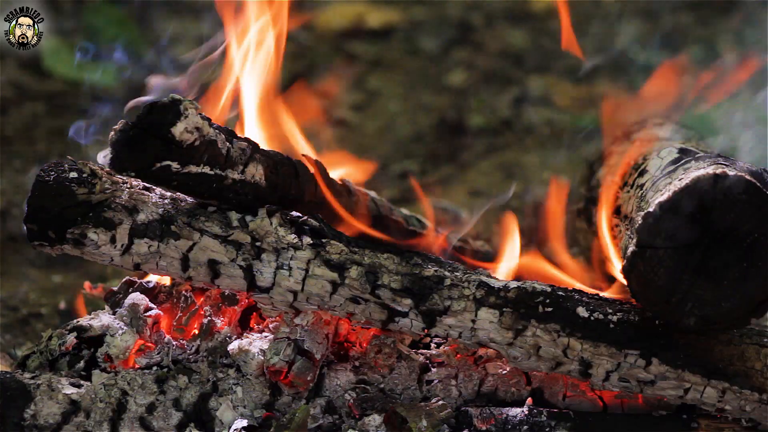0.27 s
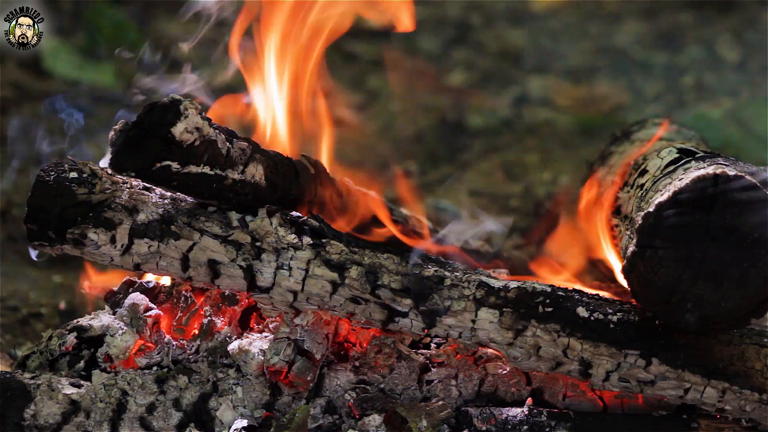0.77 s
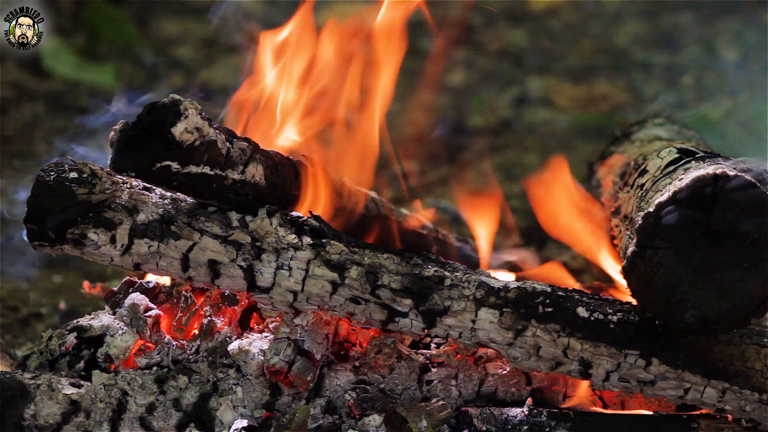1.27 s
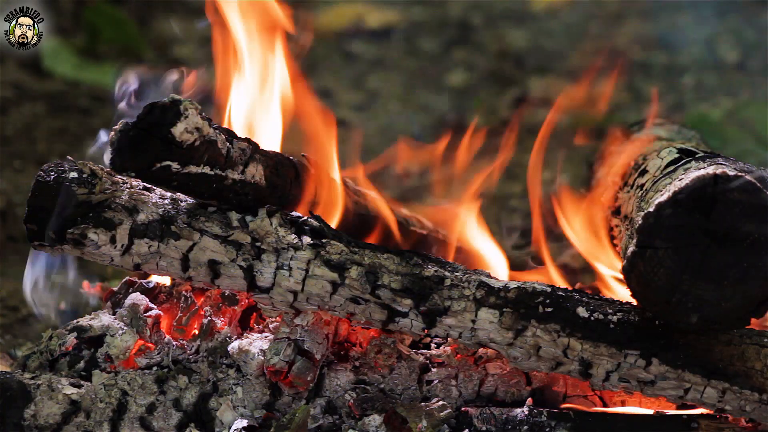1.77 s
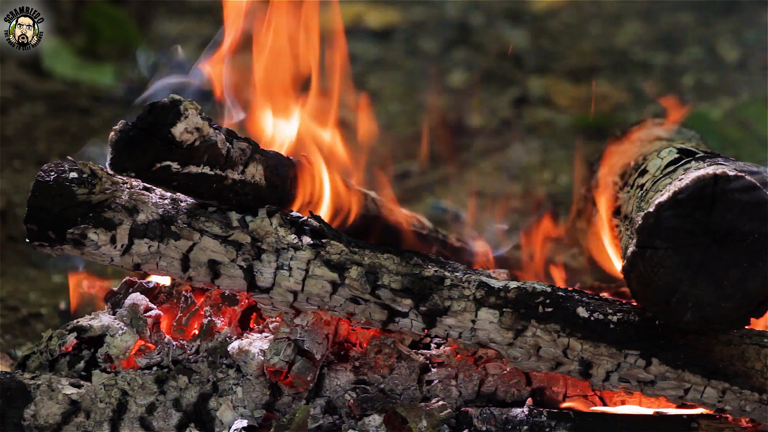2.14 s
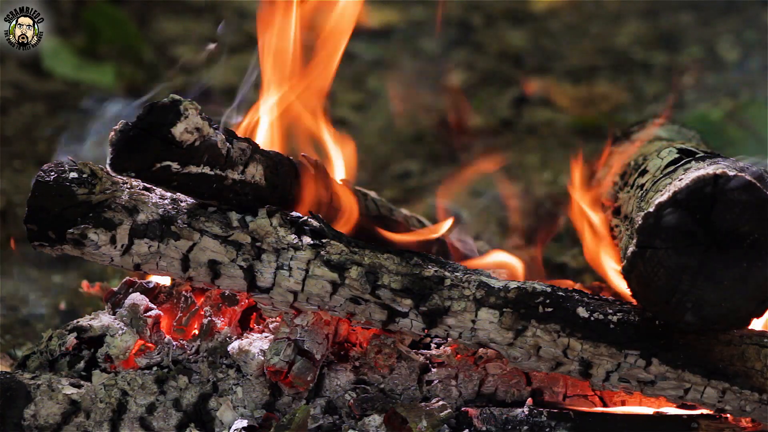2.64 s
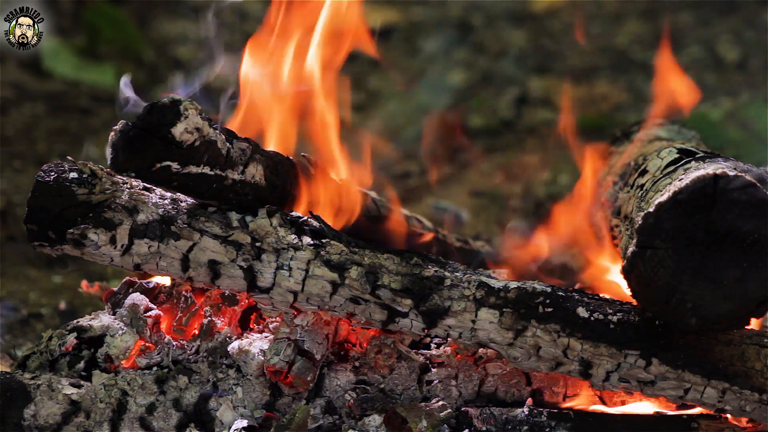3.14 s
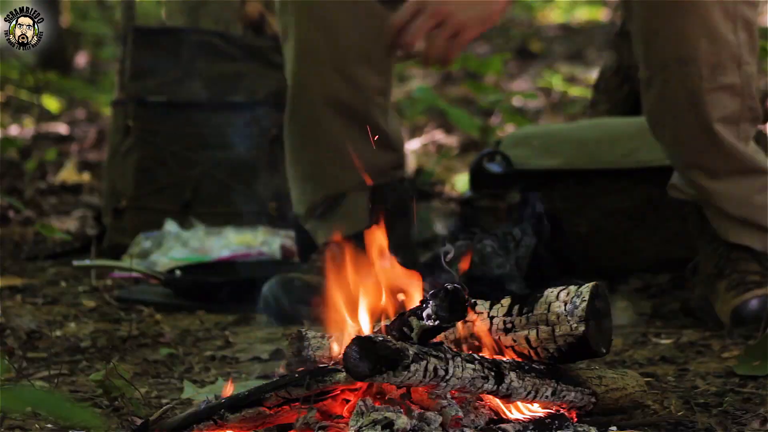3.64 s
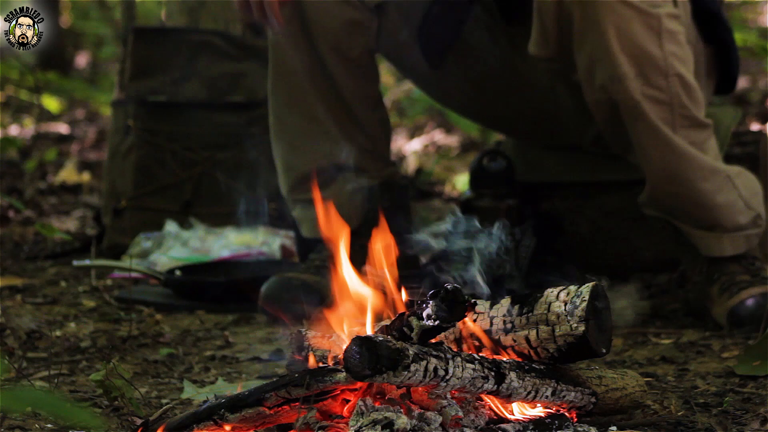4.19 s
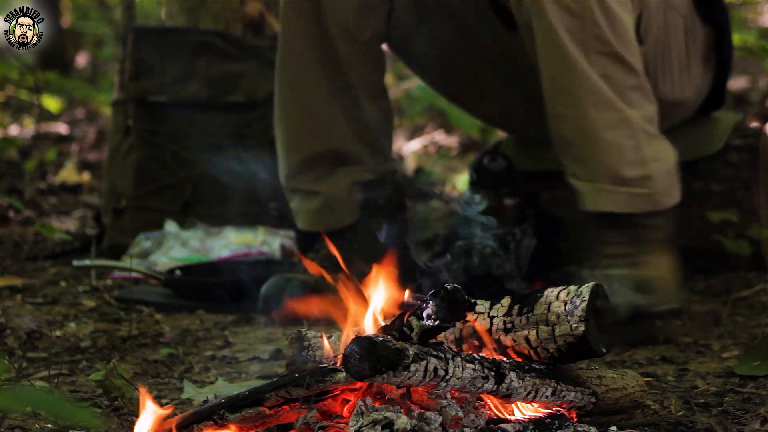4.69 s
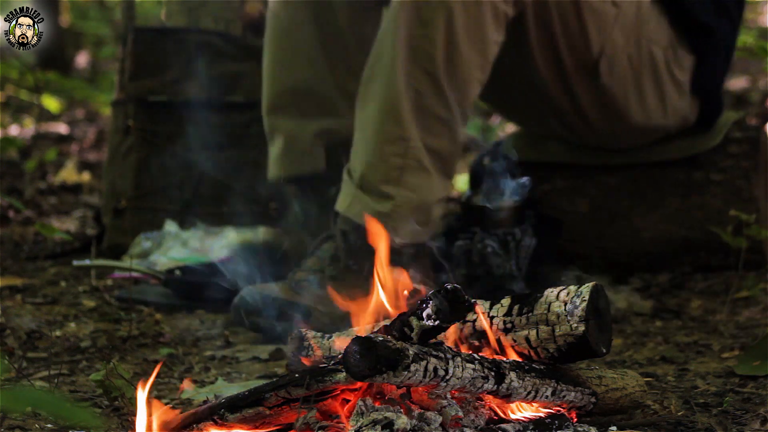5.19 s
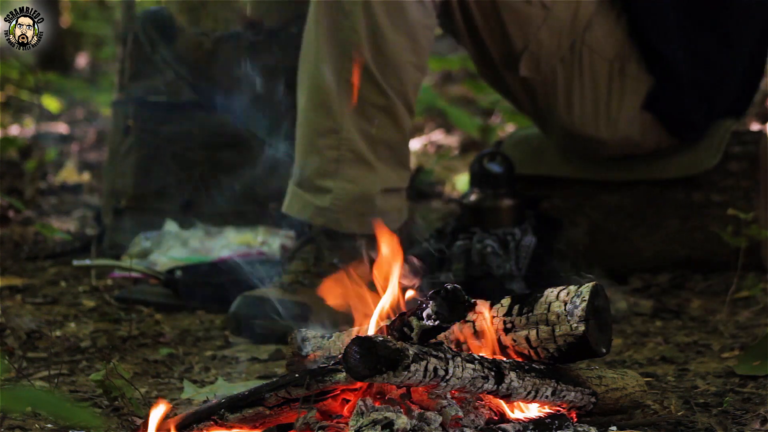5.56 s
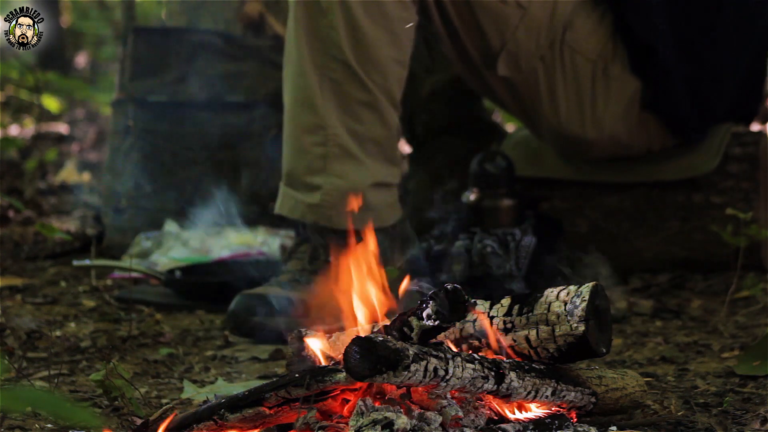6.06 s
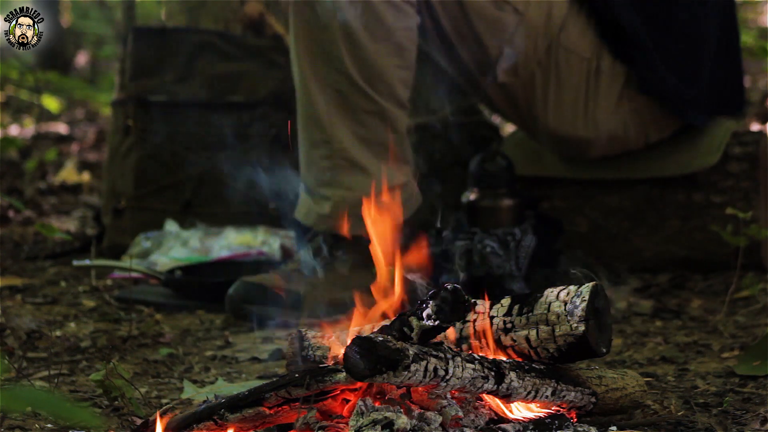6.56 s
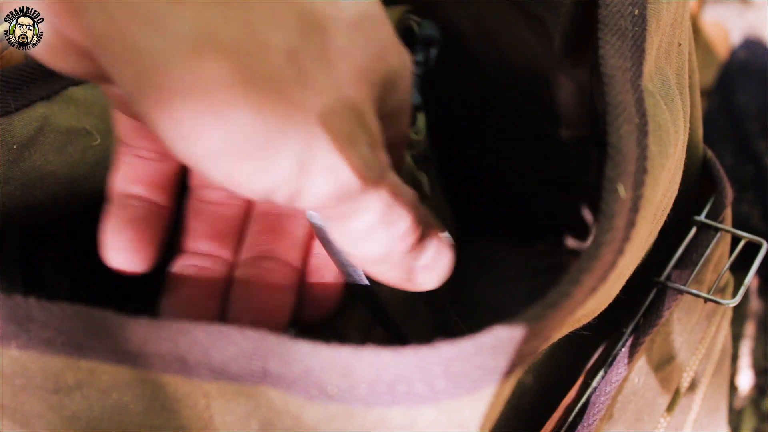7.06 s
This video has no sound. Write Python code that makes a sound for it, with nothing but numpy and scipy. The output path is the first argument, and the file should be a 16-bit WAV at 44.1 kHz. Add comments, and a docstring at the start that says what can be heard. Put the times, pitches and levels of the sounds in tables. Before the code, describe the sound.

A small wood fire flutters, hisses and pops under rasping katydids and a distant insect chorus, then cuts abruptly to canvas rummaging and hard clicks.

```python
"""Small wood fire in summer woods

One microphone by a fire: shaped noise flutters, hisses and thuds, and ringing noise bursts tick and pop.
Two near katydids chirp near 7 kHz, rattling tones that drift in and out of step; a third buzzes with
falling pitch. Far off, bands of noise make the insect chorus, over a low outdoor rumble.
Near the end the scene cuts to a quieter spot: a hand rummages in a canvas bag, in two layers of
uneven noise, and hard things click."""
import sys
import numpy as np
from scipy import signal
from scipy.fft import rfft, irfft, next_fast_len
from scipy.io import wavfile
from scipy.ndimage import map_coordinates

SR = 44100
rng = np.random.default_rng(int(sys.argv[2]) if len(sys.argv) > 2 else 0)


def wav_out(sig):
    """Save sig, one row per channel (or a flat mono array), as 16-bit PCM at SR to the path in sys.argv[1]."""
    wavfile.write(sys.argv[1], SR, np.round(np.clip(np.atleast_2d(sig).T, -1, 1) * 32767).astype(np.int16))


N = 323235

CUT_S = 6.82  # the change of place
TOP_HZ = 16000  # band limit of the recorder

# Low outdoor rumble, spectrum: f/Hz, level/dB per Hz
RUMBLE_TONE = [(15, 2), (35, -30), (52, -7), (64, 1), (85, -3), (105, -3), (135, -4), (175, -6),
               (230, -9.5), (300, -12.5), (600, -31.5), (2000, -53)]

# Far chorus, one band for each species: f/Hz, width/Hz, level/dB
CHORUS = [(4375, 250, -68.5), (4770, 240, -63.5), (5180, 140, -68), (6680, 1100, -61.5),
          (7600, 1540, -62.5)]

# Near katydids, evenly paced calls: middle of first call t/s, run ends t/s, period/s, level/dB before trim
HIGH_RUNS = [(.002, 1.4, 0.24, -55.5), (1.76, 3.4, .2565, -56), (3.452, 6.9, .257, -55.5)]
LOW_RUNS = [(.04, 1.65, .301, -56.5), (1.78, 6.95, .2965, -55)]
# Long bouts of the third katydid: middle of first bout t/s, run ends t/s, period/s, level/dB
BUZZ_RUNS = [(.86, 6.3, 1.201, -57)]

# Hand in the bag: t/s, handling level/dB before trim, scrape level/dB
BAG_MOVES = [(6.86, -62, -56.5), (6.94, -63, -56), (7.04, -51.5, -53.5), (7.19, -47.5, -51),
             (7.245, -52, -56.5), (7.29, -50.5, -46), (7.32, -50, -44)]
# Spectra of the handling and the scrape: f/Hz, level/dB per Hz
HANDLING_TONE = [(60, -18), (130, -4.5), (290, 1.5), (500, 1), (640, -4.5), (1400, -7.5), (3000, -25),
                 (9000, -52)]
SCRAPE_TONE = [(300, -3), (900, -10), (1500, 3.5), (2100, -0.5), (4000, 1.5), (7000, -3.5), (10000, -11),
               (16000, -13)]
# Clicks of the gear: t/s, level/dB before trim, pitch f/Hz, spread/octaves, t60/s
CLICKS = [(6.8231, -33.5, 3400, 0.82, .014), (6.8472, -39, 1000, 1.4, .007), (6.9579, -44, 2000, 1.5, .008),
          (6.9722, -28, 1910, 1.9, 0.0065), (6.9755, -39.5, 5000, 1.6, .009),
          (7.0437, -46.5, 3200, 0.79, .01), (7.078, -45, 4500, 1.1, 0.0045),
          (7.1383, -38.5, 5850, 0.82, 0.0062), (7.2152, -26.5, 8400, 0.84, 0.0027),
          (7.2157, -33.5, 1300, 1.3, 0.0054)]

# Rush of the flames, with three early flares: t/s, level/dB before trim
FLAME_LEVEL = [(0, -56), (.48, -55.5), (.62, -52.5), (.8, -54.5), (1.03, -54), (1.14, -51), (1.3, -55.5),
               (1.58, -55.5), (1.8, -48.5), (1.92, -55), (2.05, -54.5), (2.3, -57), (3.15, -58.5),
               (3.5, -57), (4.4, -59), (5.2, -56), (5.7, -57.5), (6.8, -58)]
# Low puffs of flapping flame: t/s, level/dB
PUFFS = [(1.63, -51), (2.37, -54), (3.19, -52), (3.54, -53), (4.35, -51)]
# Dull thuds in the fire: t/s, level/dB
THUDS = [(.291, -57), (.622, -47.5), (.71, -55), (3.114, -51.5), (3.57, -51.5), (4.285, -51)]
# Pops of the burning wood: t/s, level/dB before trim, pitch f/Hz, spread/octaves, t60/s
POPS = [(.1074, -51, 14000, .8, .007), (.2173, -40.5, 13000, .75, .0053), (.3582, -39, 1750, 0.95, 0.011),
        (.8128, -42.5, 1200, 0.76, .01), (.9146, -46, 2600, 1.7, 0.0055), (1.1138, -45, 2780, 1.2, .012),
        (2.2087, -51, 13000, .7, .012), (3.0115, -38.5, 1500, 1.6, 0.014), (3.3171, -45, 4500, 2.9, .004),
        (4.1793, -38.5, 1500, 1.6, 0.011), (4.485, -46, 3500, 2.7, .005), (4.6841, -45.5, 5000, 2.4, .02),
        (4.7559, -45.5, 9000, .6, .004), (5.3729, -42.5, 5500, 3.1, 0.0034),
        (5.4331, -44.5, 12000, 1.6, 0.0036), (5.881, -41, 2000, 2.6, .006), (6.0445, -48, 10500, .7, .006),
        (6.374, -38.5, 8000, .8, .004), (6.6819, -40.5, 1400, 1.6, .014)]
# Spectra of the fire's layers: f/Hz, level/dB per Hz
FLAME_TONE = [(120, -18), (250, -4), (480, 1.5), (750, 0), (1050, -.5), (2000, -12), (3500, -12),
              (7000, -13), (16000, -50)]
FLARE_TONE = [(500, -18), (1500, 7.5), (3000, 1), (4500, -17), (8000, -18), (16000, -15)]
PUFF_TONE = [(12, -12), (32, 8), (55, 2), (120, -14), (300, -23), (600, -30), (2000, -57)]
THUD_TONE = [(50, -6), (140, 4), (450, 7), (800, 0), (2000, -28), (6000, -60)]
HISS_TONE = [(100, -13), (500, -5.5), (1000, -1), (2200, -1.5), (3300, 0.2), (4300, 0.5), (5600, -3),
             (7500, -4), (9500, -7.5), (13000, -6), (16000, -7)]

# Bands of a pop or click, as knock, crack, snap and tick: from f/Hz, to f/Hz
SNAP_BANDS = [(720, 1990), (2300, 4400), (5700, 7950), (9200, 16300)]
# Low thump under a knock: from f/Hz, to f/Hz
BODY_BAND = (330, 900)


def amp(db):
    """Level in dB to amplitude."""
    return 10 ** (np.asarray(db) / 20)


def unit(x):
    """x scaled to rms 1."""
    return x / np.sqrt(np.mean(x ** 2) + 1e-20)


def clock():
    """The time of each sample in seconds."""
    return np.arange(N) / SR


def curves(rows):
    """One value per sample for each column after the time."""
    times, *columns = np.transpose(rows)
    return [np.interp(clock(), times, column) for column in columns]


def wobble(rate):
    """A smooth random curve, rate knots a second."""
    knots = rng.standard_normal(int(N * rate / SR) + 4)
    return map_coordinates(knots, [np.arange(N) * rate / SR])


def filtered(x, response):
    """x times a complex response of frequency."""
    m = next_fast_len(len(x) + 8192)
    spectrum = rfft(x, m) * response(np.fft.rfftfreq(m, 1 / SR))
    return irfft(spectrum, m)[:len(x)]


def resonate(x, hz, width_hz):
    """x through a resonance applied twice, for steep skirts."""
    def response(f):
        damping = 1j * f * width_hz
        return (damping / (hz * hz - f * f + damping)) ** 2
    return filtered(x, response)


def band_noise(hz, width_hz):
    """Noise of rms 1 ringing around one frequency."""
    return unit(resonate(rng.standard_normal(N), hz, width_hz))


def noise(tone):
    """Noise of rms 1 whose spectrum follows the points of tone."""
    hz, db = np.transpose(tone)
    def response(f):
        return amp(np.interp(np.log(f + 1), np.log(hz), db))
    return unit(filtered(rng.standard_normal(N), response))


def cycles(hz):
    """Cycles counted so far at a changing rate."""
    return np.cumsum(hz) / SR


def swells(rows, length, edge):
    """A rounded swell around each (t/s, level/dB) row; length in seconds between half-amplitude points."""
    t = clock()
    total = np.zeros(N)
    for middle, db in rows:
        distance = np.minimum(np.abs(2 * (t - middle) / length), 10)
        total += amp(db) / (1 + distance ** edge)
    return total


def beats(runs):
    """The (middle t/s, level/dB) of every call in evenly paced runs."""
    return [(s, db) for first, end, period, db in runs for s in np.arange(first, end, period)]


def snaps(rows, attack, body_db, tail_db, tail_t60):
    """Millisecond bursts ring most in the bands near their pitch, then a faint tail off the ground."""
    out = np.zeros(N + SR)
    t = np.arange(SR // 10) / SR
    bands = [signal.butter(2, edges, "bandpass", fs=SR, output="sos") for edges in [BODY_BAND, *SNAP_BANDS]]
    band_octaves = np.log2(SNAP_BANDS).mean(axis=1)
    span = np.sqrt(.005 * SR)  # band levels are rms over 5 ms
    for s, db, hz, spread, t60 in rows:
        shares = np.exp(-.5 * ((band_octaves - np.log2(hz)) / spread) ** 2)
        shares = shares / np.linalg.norm(shares)
        body_share = shares[0] * amp(body_db)
        burst = (1 - np.exp(-t / attack)) * amp(-60 * t / t60)
        envelope = burst + amp(tail_db - 60 * t / tail_t60)
        for share, band in zip([body_share, *shares], bands):
            ring = signal.sosfilt(band, envelope * rng.standard_normal(len(t)))
            out[round(s * SR):][:len(t)] += amp(db) * share * span * ring / np.linalg.norm(ring)
    return out[:N]


def rumble():
    """A low outdoor rumble of noise, with a faint wavering hum from a narrow resonance."""
    hum = band_noise(135.5, 10.8)
    return amp(-55.5 + 1.6 * wobble(7.6)) * noise(RUMBLE_TONE) + amp(-66.5) * hum


def chorus():
    """Many far insects blur into bands of noise, each species swelling on its own."""
    total = np.zeros(N)
    for hz, width, db in CHORUS[:3]:
        total += amp(db + 1.25 * wobble(22) + 1.6 * wobble(8)) * band_noise(hz, width)
    # the two broad upper bands are steadier
    for hz, width, db in CHORUS[3:]:
        total += amp(db + .8 * wobble(22)) * band_noise(hz, width)
    return total


def woods(x, wet_db, t60):
    """Trunks and leaves scatter a short diffuse tail."""
    t = np.arange(SR // 2) / SR
    tail = rng.standard_normal(len(t)) * amp(-60 * t / t60)
    return x + amp(wet_db) * signal.fftconvolve(x, tail / np.linalg.norm(tail))[:N]


def buzzer(hz, fall_hz, stroke_rate, rough_db):
    """Long bouts of quick wing strokes; the pitch falls within each stroke."""
    stroke = cycles(stroke_rate * (1 + 0.018 * wobble(8))) % 1
    pitch = hz - fall_hz * (stroke - .5) + 130 * wobble(500)
    loudness = np.sin(np.pi * stroke) ** 2 * amp(rough_db * wobble(300))
    wing = loudness * np.sin(2 * np.pi * cycles(pitch))
    return swells(beats(BUZZ_RUNS), length=0.38, edge=4.6) * unit(wing)


def katydid(chirps, hz, length, stroke_rate, stroke_depth, tooth_rate, tooth_depth,
            glide_hz, arch_hz, bend_hz, waver_hz):
    """A ringing wing: each chirp is a few strokes, each stroke rattles over the teeth of a file."""
    t = clock()
    middles = np.transpose(chirps)[0]
    nearest = np.abs(t[:, None] - middles).argmin(axis=1)
    from_middle = t - middles[nearest]
    stroke = np.sin(2 * np.pi * cycles(stroke_rate * (1 + 0.15 * wobble(18))))
    tooth = np.sin(2 * np.pi * cycles(tooth_rate * (1 + 0.112 * wobble(70))))
    # the wing sounds loudest and highest in mid-stroke and as a tooth catches
    drive = (1 + stroke_depth * stroke) * (1 + tooth_depth * tooth) * amp(wobble(stroke_rate))
    glide = glide_hz * from_middle / length
    pitch = hz + glide + arch_hz * stroke + bend_hz * tooth + waver_hz * wobble(90)
    wing = drive * np.sin(2 * np.pi * cycles(pitch))
    return swells(chirps, length, edge=5.5) * unit(wing)


def file_rasp():
    """The scrape of the file in each chirp of the lower katydid, as a band of noise."""
    return swells(beats(LOW_RUNS), length=0.13, edge=4.5) * band_noise(6400, 620)


def near_katydids():
    """Three near singers, their wings ringing among the trunks."""
    high = katydid(beats(HIGH_RUNS), hz=6894, length=0.11, stroke_rate=42, stroke_depth=0.29,
                   tooth_rate=200, tooth_depth=0.6, glide_hz=6.4, arch_hz=9.4, bend_hz=35, waver_hz=27.2)
    low = katydid(beats(LOW_RUNS), hz=6590, length=0.16, stroke_rate=39, stroke_depth=.7,
                  tooth_rate=74, tooth_depth=0.51, glide_hz=120, arch_hz=55, bend_hz=23, waver_hz=52.0)
    buzz = buzzer(hz=6425, fall_hz=1080, stroke_rate=65, rough_db=1.7)
    near = amp(-1) * high + amp(-2.5) * low + amp(-7) * file_rasp() + buzz
    return woods(near, wet_db=-5, t60=0.26)


def bag():
    """A hand shifts the canvas and scrapes along it in small jerks, as unevenly swelling noise."""
    handling_db, scrape_db = curves(BAG_MOVES)
    handling = amp(handling_db + 1.0 + 0.59 * wobble(45)) * noise(HANDLING_TONE)
    scrape = amp(scrape_db + 1.7 * wobble(280)) * noise(SCRAPE_TONE)
    return handling + scrape


def bag_clicks():
    """Hard things in the bag knock together in short ringing bursts."""
    return amp(-0.3) * snaps(CLICKS, attack=0.000071, body_db=-6.0, tail_db=-34, tail_t60=.05)


def crackle(rate, db, spread_db, t60):
    """Tiny random ticks from the embers, most of them faint, each dying within milliseconds."""
    chance = rng.random(N)
    size = np.minimum(rng.standard_exponential(N), 3)
    ticks = (chance < rate / SR) * amp(db + spread_db * size)
    decay = amp(-60 * np.arange(SR // 20) / SR / t60)
    dying = signal.fftconvolve(ticks, decay)[:N]
    return resonate(dying * rng.standard_normal(N), 9000, 12000)


def flames():
    """Rushing, flapping flame: shaped noise, brighter when it flares, with low puffs."""
    flame_db = curves(FLAME_LEVEL)[0] + 1.45 * wobble(45)
    rush = amp(flame_db + 0.15) * noise(FLAME_TONE)
    # the bright layer rises 1.85 dB for each dB of the rush
    flare = amp(-55.0 + 1.85 * (flame_db + 50)) * noise(FLARE_TONE)
    puffs = swells(PUFFS, length=0.06, edge=2.3) * noise(PUFF_TONE)
    return rush + flare + puffs


def burning_wood():
    """The wood hisses steadily, thuds dully, ticks and pops: shaped noise and ringing bursts."""
    thuds = swells(THUDS, length=0.017, edge=2.8) * noise(THUD_TONE)
    hiss = amp(-53.5 + 0.34 * wobble(3.54)) * noise(HISS_TONE)
    pops = amp(-0.8) * snaps(POPS, attack=.0001, body_db=-9, tail_db=-35, tail_t60=.06)
    ticks = crackle(rate=20, db=-50.5, spread_db=4.5, t60=0.0054)
    return thuds + hiss + pops + ticks


def scene():
    """The fire in the woods, then the bag at the quieter spot, the same in both channels."""
    after = np.clip((clock() - CUT_S) / 0.011 + .5, 0, 1)  # 11 ms crossfade
    camp = chorus() + near_katydids() + flames() + burning_wood()
    background = amp(-3 * after) * rumble()  # 3 dB lower at the second spot
    mono = background + (1 - after) * camp + after * bag() + bag_clicks()
    return np.array([mono, mono])


def record(dry):
    """The recorder keeps nothing above its band limit."""
    return np.array([filtered(channel, lambda hz: hz < TOP_HZ) for channel in dry])


dry = scene()
out = record(dry)
wav_out(out)
```